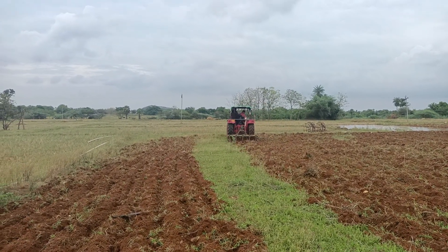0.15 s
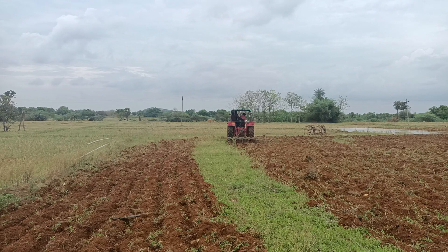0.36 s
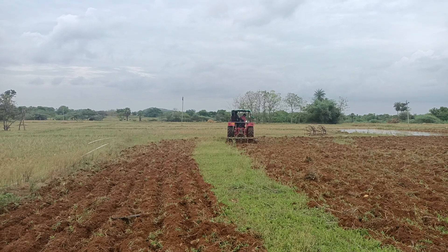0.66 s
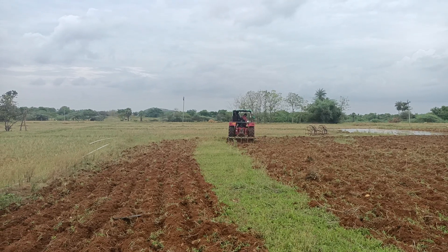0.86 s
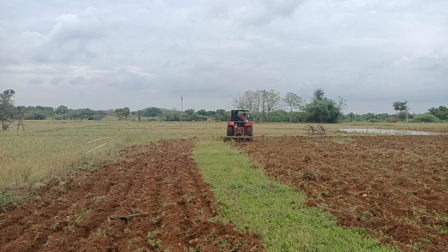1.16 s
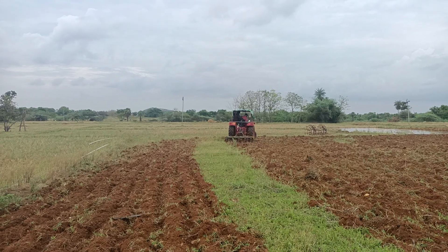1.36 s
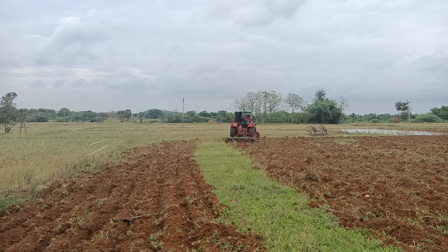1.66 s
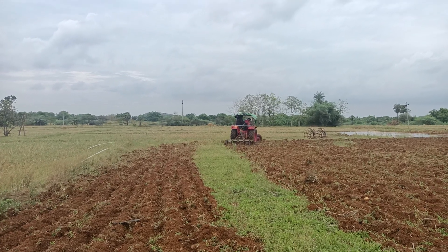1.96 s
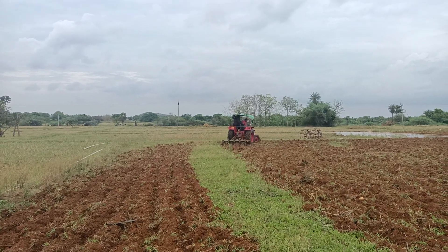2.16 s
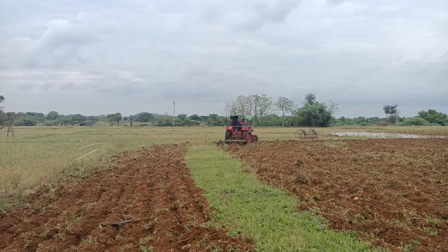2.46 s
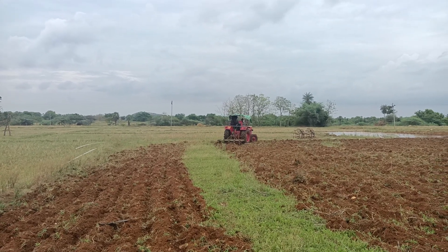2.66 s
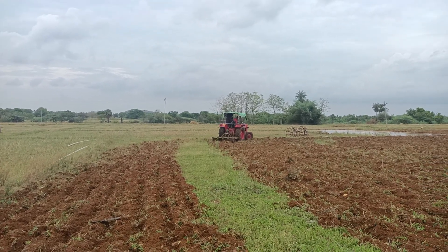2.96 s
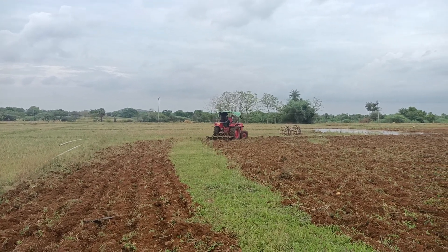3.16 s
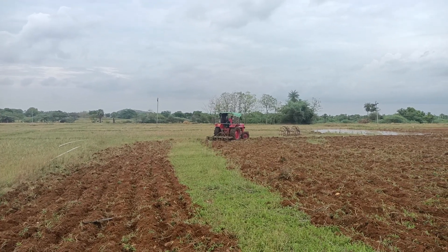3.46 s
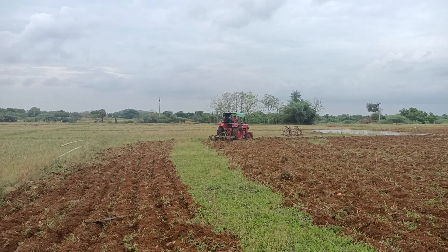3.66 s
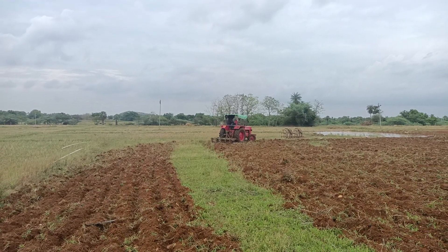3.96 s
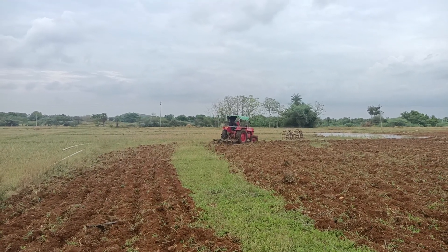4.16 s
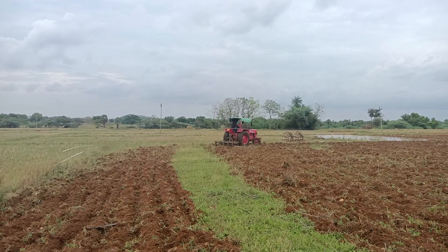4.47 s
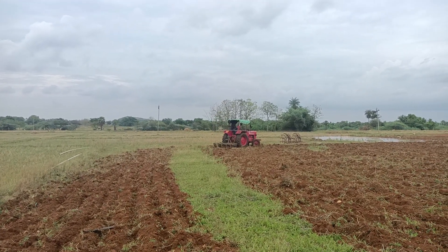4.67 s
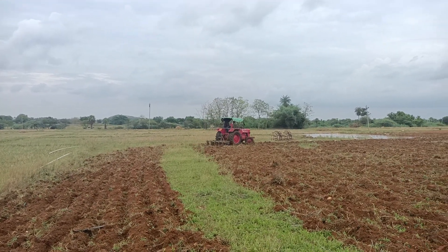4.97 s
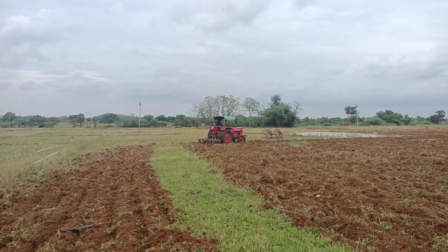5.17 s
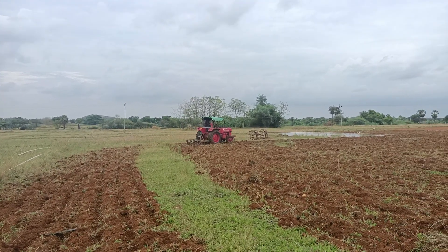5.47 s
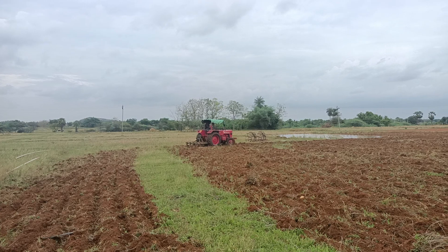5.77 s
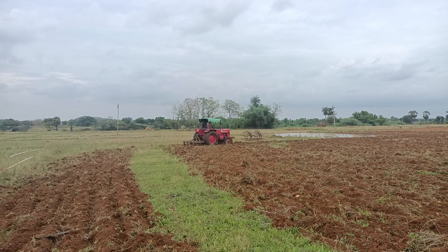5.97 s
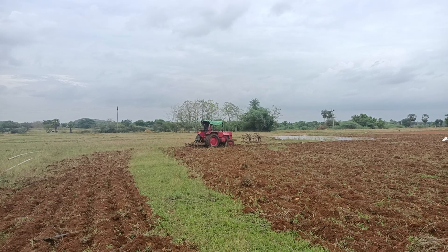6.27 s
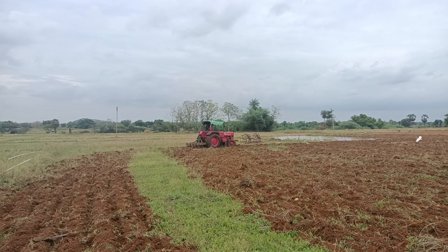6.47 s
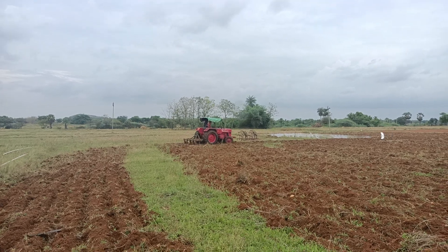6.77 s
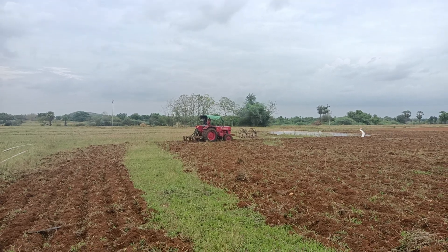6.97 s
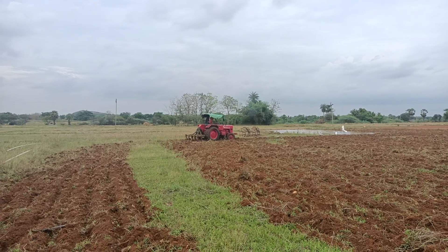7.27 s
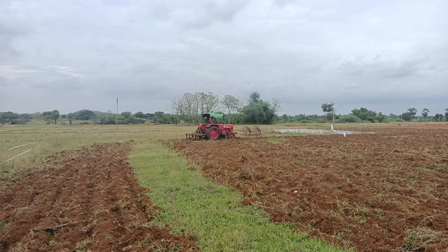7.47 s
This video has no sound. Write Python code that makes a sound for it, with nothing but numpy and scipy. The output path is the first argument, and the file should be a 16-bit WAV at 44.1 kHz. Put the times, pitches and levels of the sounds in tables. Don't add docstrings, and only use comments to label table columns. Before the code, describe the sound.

An open field heard through an unshielded stereo microphone. From 0 to 3 seconds a distant diesel tractor runs fast, its firings nearly merging into a low throbbing drone with rough exhaust and faint hiss; a few wind bumps land on the right around 1 second. From about 2.7 to 4.2 seconds wind slams both sides, strongest on the left near 3.2 to 3.7, with booming, overloaded pops. Beneath it the engine bogs down sharply, and steel tines clank at 3.6. Between 4 and 5.5 seconds it chugs slowly and unevenly, each stroke a thump, knock and hissing puff. From 5.4 bird chips tick quickly in front while the engine pulls harder, brighter and more clattery. It speeds up near 6.8, coasts with softened puffs around 7, slows, and begins rising again at the 7.6-second end. Tiny insect buzzes and metal clinks appear throughout.

```python
import sys
import numpy as np
from scipy import signal
from scipy.fft import rfft, irfft, next_fast_len
from scipy.io import wavfile
from scipy.ndimage import uniform_filter1d

SR = 44100
rng = np.random.default_rng(int(sys.argv[2]) if len(sys.argv) > 2 else 0)


def magnitude_from_level(level_db):
    exponent = np.asarray(level_db, float) / 20
    return 10 ** exponent


def generate_wav(signal):
    frames = np.transpose(np.atleast_2d(signal))
    scaled = np.clip(frames, -1, 1) * 32767
    pcm = np.round(scaled).astype(np.int16)
    wavfile.write(sys.argv[1], SR, pcm)


N = 335601

# (frequency [Hz], level [dB per Hz])
FIELD_COLOUR = [(20, -31), (40, 2.5), (100, 5), (200, -9.5), (330, -19), (680, -16), (2500, -18.5),
                (3700, -21), (5600, -39), (6900, -32.5), (8500, -36.5), (10800, -40), (12000, -44),
                (16000, -56)]
# (time [s], left level [dB], right level [dB])
BREEZE = [(0, -39.5, -40.5), (1.3, -40, -41), (2.3, -40, -45), (3.5, -31, -51), (4.3, -47.5, -51.5),
          (4.9, -46, -53.5), (5.6, -50, -57), (6.9, -59, -74), (7.6, -50, -43)]
# (time [s], flutter level [dB], bass over flutter [dB], length [ms])
LEFT_GUSTS = [(0.68, -55.5, 27, 18), (1.22, -54, 21, 50), (2.556, -64, 30.5, 74), (2.821, -45, 18, 20),
              (2.864, -41.5, 10, 97), (2.943, -19.5, -5, 28), (3.0, -47, 23.5, 72), (3.059, -20.5, -7, 31),
              (3.138, -32, 9, 46), (3.2, -11.5, -5, 26), (3.318, -17.5, -7, 34), (3.404, -21, -2, 15),
              (3.41, -27, -0.5, 91), (3.646, -32, 5.5, 137), (3.688, -20, 3, 18), (3.834, -49.5, 28, 16),
              (3.878, -41, 18.5, 48), (3.991, -44, 22, 45), (4.061, -48, 21.5, 44), (4.17, -33, 9, 93),
              (4.356, -49.5, 17, 24), (5.14, -39.5, 12, 61), (5.238, -51, 18, 51), (5.32, -58.5, 21.5, 33),
              (5.67, -66, 31, 60), (6.048, -67, 23.5, 140), (6.147, -66, 29.5, 66), (6.277, -63.5, 26, 30),
              (7.262, -59, 30, 19), (7.528, -69, 32, 63), (7.568, -67, 36.5, 26)]
RIGHT_GUSTS = [(0.048, -41, 13.5, 29), (0.649, -43, 7.5, 62), (0.798, -50.5, 28.5, 29),
               (0.887, -32.5, 8, 61), (0.921, -61, 3, 25), (0.998, -42.5, 8, 32), (1.114, -24.5, -1, 11),
               (1.272, -36, 4, 17), (2.726, -31.5, 3, 60), (2.805, -21, 5, 16.4), (2.862, -42, 13, 44),
               (2.945, -23.5, -2, 32), (3.027, -38.5, 11.5, 80), (3.086, -27.5, -3, 22),
               (3.274, -21, -4, 36), (3.338, -43, 10.5, 90), (3.381, -56, -3, 40), (3.58, -52, 19, 105),
               (3.646, -48, 16, 36), (4.141, -53, 19, 14), (7.544, -77, 13, 36)]
# (time [s], peak pressure [full scale], frequency [Hz])
LEFT_POPS = [(2.9266, 0.28, 135), (2.9417, 0.36, 200), (2.9493, 0.17, 90), (3.0517, -0.22, 200),
             (3.0587, -0.43, 240), (3.0971, 0.13, 90), (3.1285, 0.2, 200), (3.1439, -0.33, 200),
             (3.1775, -0.37, 165), (3.1902, -0.22, 90), (3.2011, -0.77, 200), (3.2083, -0.47, 240),
             (3.222, 0.61, 90), (3.229, -0.36, 240), (3.2382, -0.16, 90), (3.2934, 0.13, 90),
             (3.3152, -0.41, 240), (3.3254, -0.6, 135), (3.3476, -0.17, 90), (3.3861, -0.32, 240),
             (3.4018, 0.6, 135), (3.4259, -0.37, 200), (3.4557, 0.31, 110), (3.4869, -0.14, 110),
             (3.6064, 0.21, 165), (3.6559, -0.22, 135), (3.6734, 0.16, 135), (3.6874, -0.26, 290),
             (3.6956, 0.52, 135), (3.7046, 0.13, 90), (3.8806, -0.19, 200), (4.1068, 0.16, 135),
             (4.1375, 0.18, 110), (4.2044, 0.2, 135)]
RIGHT_POPS = [(0.8032, -0.14, 110), (0.8872, -0.13, 110), (0.9017, 0.08, 90), (1.111, 0.37, 240),
              (1.1198, -0.1, 135), (2.6356, 0.09, 110), (2.7241, -0.12, 240), (2.7314, -0.09, 110),
              (2.7461, -0.13, 200), (2.8037, 0.32, 165), (2.8184, -0.1, 165), (2.9334, 0.16, 200),
              (2.9527, 0.16, 110), (3.021, -0.12, 200), (3.03, -0.21, 165), (3.0479, 0.1, 165),
              (3.0734, 0.07, 90), (3.271, 0.17, 165), (3.278, 0.28, 110), (3.2918, 0.2, 200),
              (3.3047, 0.1, 110), (3.3797, -0.07, 90)]
# (time [s], peak pressure [full scale], frequency [Hz], port [0 left, 1 right])
STRAY_POPS = [(5.126, .17, 220, 0), (5.245, .07, 150, 0), (7.263, .075, 105, 0), (7.53, -.1, 120, 0),
              (3.3256, -.3, 400, 0), (3.4018, .25, 400, 0), (3.4058, -.42, 330, 0), (3.646, -.2, 280, 0),
              (3.5806, .1, 260, 0), (4.056, .1, 240, 0), (4.175, .14, 380, 0), (1.111, .12, 550, 1),
              (2.8045, .15, 450, 1), (3.274, -.3, 400, 1)]
# (time [s], level [dB], frequency [Hz], 60 dB decay [s])
CLINKS = [(.012, -49, 9200, 0.22), (.76, -52, 9200, 0.36), (.76, -62, 6800, .1), (3.463, -49.5, 4600, 0.07),
          (3.56, -58, 5720, 0.28), (3.585, -40, 2750, 0.15), (3.575, -53, 4650, 0.25),
          (3.585, -49, 5740, 0.18), (3.58, -49, 5250, .06), (3.585, -52, 7400, 0.099),
          (3.586, -53, 10400, 0.11), (3.575, -61, 11600, .2), (3.84, -54.5, 4060, 0.24),
          (3.93, -52, 6800, 0.35), (3.93, -48, 9200, 0.18), (3.958, -46, 9200, 0.22),
          (4.093, -43, 4570, 0.055), (5.793, -42, 4450, 0.08), (5.8, -42, 4600, .14),
          (7.115, -54, 4600, 0.1), (7.06, -65, 7800, .9), (7.24, -68, 7800, .9), (3.585, -63, 12300, .07),
          (3.585, -63, 14100, .07), (3.58, -50, 6050, .18), (4.65, -54, 4550, .14), (4.83, -54, 4050, .1),
          (4.955, -55, 4550, .14), (6.21, -51, 4000, .1), (6.77, -48, 3620, .1), (3.59, -54, 9000, .08)]
# (time [s], peak level [dB], frequency [Hz])
CHIPS = [(5.027, -35, 3600), (5.1342, -35, 3730), (5.4251, -23, 4200), (5.431, -33, 4050),
         (5.6246, -27.5, 3390), (5.6999, -34, 4600), (5.8491, -32, 3510), (5.8716, -28, 3930),
         (6.1764, -41, 4940), (6.2377, -29, 3600), (6.2881, -26.5, 3420), (6.3799, -28.5, 3680),
         (6.5026, -36, 3750), (6.6184, -29.5, 3470), (6.6473, -29, 3210), (6.669, -35, 3600),
         (6.6947, -32, 3380), (6.7347, -37, 3650), (6.7566, -35, 3700), (7.1586, -30.5, 3330),
         (7.21, -30.5, 2840), (7.236, -33, 3390), (7.3422, -38, 3900), (7.3736, -30, 2980),
         (7.3911, -29.5, 3520), (7.4919, -35, 2900)]
# (time [s], level [dB], start in the rasp [samples], length [s])
BUZZES = [(.70, -62, 8200, .05), (1.19, -64, 8900, .04), (3.44, -66, 8500, .05), (3.735, -64, 8500, .05),
          (1.5, -66, 8500, .05), (1.93, -65, 8500, .05), (3.988, -66, 8500, .05), (4.32, -65, 8500, .05),
          (4.67, -66, 8500, .05), (4.94, -66, 8500, .05), (6.68, -62, 8500, .045), (5.33, -64, 8500, .05),
          (7.01, -60, 8500, .055), (7.415, -55, 8600, .048)]
# (time [s], firing rate [firings/s])
SPEED = [(0.0, 29.867), (0.39, 33.655), (0.69, 30.368), (0.98, 32.893), (1.65, 32.69), (3.09, 28.216),
         (3.36, 25.482), (3.71, 15.154), (4.21, 19.291), (4.62, 16.735), (5.29, 13.605), (5.97, 19.067),
         (6.4, 15.788), (6.51, 16.444), (6.77, 24.592), (6.89, 25.261), (7.29, 17.974), (7.61, 23.2)]
# (time [s], effort [dB])
EFFORT = [(0, -3.5), (.35, -6.5), (1.15, -7), (1.4, -8), (1.65, -7.5), (1.9, -6), (2.4, 0), (3.15, 1),
          (3.9, -4), (4.4, 0.5), (4.7, -1), (5.3, 5), (5.6, 11), (6.2, 12.5), (6.4, 6.5), (6.76, 12),
          (7.44, 5), (7.61, -4)]
# (start [s], length [s], share cut [0-1])
COASTS = [
    (0.07, 0.094, 0.6),
    (0.548, 0.11, 0.51),
    (3.626, .12, 0),
    (4.754, 0.062, 0.05),
    (6.807, 0.38, 0.99),
    (7.17, 0.25, 0.45),
    (7.58, .1, 0.9),
]
# (time [s], share side-on [0-1])
SWING = [(0, 0.2), (2, 0), (2.5, 0), (4.5, 0.17), (5.9, 0.65), (6.8, 0.63), (7.2, 1.01), (7.61, 0.75)]
# (first [dB], second [dB], third
# [dB], fourth [dB])
CYLINDERS = [
    (5.5, 4.5, 4, 3.5),
    (7, 5.5, 7.5, 1),
    (-2, -3, -2.5, -3.5),
    (0.5, -9, -1, -10),
]
# (base [dB], per doubling of speed [dB], share of effort [dB/dB], fuel cut [dB], side-on [dB])
LAYERS = [
    (-43, 11.5, 0.27, -15.5, -0.3),
    (-48.5, 7.5, 0.49, -15, -12),
    (-48, 2.5, 0.3, -10.5, -6),
    (-60, 2.5, 0.65, -8, 5.5),
    (-63, 4, 0.96, -35, 1),
    (-68.5, 4.5, 0.086, -2.5, 19),
]
# (frequency [Hz], level [dB per Hz])
THUMP_COLOUR = [(20, -52), (35, -45), (55, 23), (75, 18.5), (110, 7), (140, 9), (175, 2), (210, 1),
                (300, -13), (600, -76)]
ROAR_COLOUR = [(300, -48.5), (420, -2.5), (560, 8), (700, 3.5), (880, -3.5), (1230, 3), (1700, -4),
               (2700, -6.5), (3400, -12), (4500, -56.5), (9000, -90)]
CLATTER_COLOUR = [(1200, -55), (3200, -5), (4500, -12), (5600, -13.5), (6200, -52), (10000, -59)]
PUFF_COLOUR = [(3000, -59), (5500, -10), (6900, -6), (8200, -5), (9250, 1), (10500, -8), (11500, -16),
               (15800, -73)]
# (frequency [Hz], width [Hz], level [dB])
PIPE = [(1018, 93, -4), (1237, 110, 2), (1703, 170, -2.5), (2232, 100, -2.5), (2726, 140, -3),
        (3174, 100, -5), (4540, 46, -22)]
# (frequency [Hz], share [0-1])
SAME = [(100, 0.87), (600, 0.98), (1200, 0.95), (2500, 0.75), (4000, 0.9), (6000, 0.6), (9000, 0.7),
        (14000, 0.7)]
# (frequency [Hz], left minus right [dB])
LEAN = [(60, 2), (120, -3.5), (240, -0.5), (480, 0.0), (950, -1), (1890, 1), (3770, -3.5), (7520, -1.5),
        (15000, -11.5)]
# (frequency [Hz], left leads by [rad])
LEAD = [(600, -0.25), (1200, 0), (2500, -1.43), (4000, -1.5), (5500, -.5), (7000, -4), (9000, -4),
        (14000, -4.5)]
# (frequency [Hz], share [0-1])
ECHO = [(400, 0.012), (950, 0.033), (1450, 0.33), (1900, 0.48), (2900, 0.55), (3400, 0.065), (6000, 0.24)]

FIELD_DB = -50
FIRST_TURN = .70
REFERENCE_SPEED = 18.5
CUT_EDGE_S = 0.067
FAN_HZ_PER_FIRING, FAN_DB, FAN_CUT_DB = 14.2, -55.5, -7
FAN_FADES_BELOW, FAN_FADE_DB_PER_FIRING = 30.4, 13.5
PIPE_DB, PIPE_CHANCE_DB = -2.5, 6
PIPE_LATE = .14
ROAR_LATE_S = .006
POP_EDGE = 0.52
ECHO_S = 1 / 484
EDGE_HZ = 15920


def evened(x):
    return x / np.sqrt(np.mean(x ** 2) + 1e-20)


def read(points, hz):
    f, value = np.transpose(points)
    return np.interp(np.log(hz + 1), np.log(f + 1), value)


def curves(rows):
    s, *columns = np.transpose(rows)
    return [np.interp(np.arange(N) / SR, s, c) for c in columns]


def add(mix, s, sound):
    part = mix[round(s * SR):][:len(sound)]
    part += sound[:len(part)]


def drift(shape, samples):
    return evened(uniform_filter1d(rng.standard_normal(shape), samples))


def coloured(x, points):
    log_gain = np.log(magnitude_from_level(read(points, abs(np.fft.fftfreq(16384, 1 / SR)))))
    taps = np.fft.ifft(np.exp(np.conj(signal.hilbert(log_gain)))).real[:6000]
    return evened(signal.oaconvolve(x, taps)[:N])


def band(x, lo_hz, hi_hz, order=2):
    return evened(signal.sosfilt(signal.butter(order, [lo_hz, hi_hz], "band", fs=SR, output="sos"), x))


def field():
    return [magnitude_from_level(FIELD_DB) * coloured(v, FIELD_COLOUR) for v in rng.standard_normal((2, N))]


def breeze():
    lumps = magnitude_from_level(2.0 * np.tanh(drift((2, N), 1800)))
    rumble = band(rng.standard_normal((2, N)), 62, 155.0)
    return magnitude_from_level(np.array(curves(BREEZE))) * evened(lumps * rumble)


def gusts(rows):
    flutter, bass = np.zeros((2, N))
    for s, db, bass_db, ms in rows:
        hump = signal.windows.hann(round(ms * 0.0019 * SR)) ** 1.16
        add(flutter, max(s - ms * 0.00092, 0), magnitude_from_level(db) * hump)
        add(bass, max(s - ms * 0.00097, 0), magnitude_from_level(db + bass_db) * hump)
    noise = rng.standard_normal((3, N))
    bands = (band(noise[0], 168, 372, order=3), band(noise[1], 77.4, 149.0),
             band(noise[2], 270, 670, order=3))
    mid, low, bright = [v / np.sqrt(uniform_filter1d(v ** 2, 900) + 0.029) for v in bands]
    ragged = magnitude_from_level(3.5 * np.tanh(band(rng.standard_normal(N), 15, 70, order=3)))
    hard = .5 * (ragged * flutter) ** 1.9
    return ragged * (flutter * mid + hard * bright) + bass * low


def pops():
    out, t = np.zeros((2, N)), np.arange(-882, 882) / SR
    snap = np.cos(2 * np.pi * 480 * t) * np.exp(-(600 * t) ** 2)
    left = [(*row, 0) for row in LEFT_POPS]
    right = [(*row, 1) for row in RIGHT_POPS]
    for s, peak, hz, port in left + right + STRAY_POPS:
        swing = np.cos(2 * np.pi * hz * t) * np.exp(-(1.6 * hz * t) ** 2)
        add(out[port], s + t[0], peak * swing)
        add(out[port], s + t[0], POP_EDGE * peak * abs(peak) * snap)
    return signal.sosfiltfilt(signal.butter(2, 48, "high", fs=SR, output="sos"), out)


def insects():
    out = np.zeros(N)
    wings = 1 + 2.1 * np.cos(2 * np.pi * 240 * np.arange(N) / SR)
    rasp = band(rng.standard_normal(N), 8400, 8500) * wings
    for s, db, hz, length in BUZZES:
        n = round(length * SR)
        swell = np.linspace(.2, 1, n) * signal.windows.tukey(n, .3)
        add(out, s, magnitude_from_level(db) * swell * rasp[round(hz):][:n])
    return out


def birds():
    out, t = np.zeros(N), np.arange(1500) / SR
    u = t[:round(.007 * SR)]
    scatter = rng.standard_normal(1500) * np.exp(-t / 0.027) * (rng.random(1500) < .03)
    for s, db, hz in CHIPS:
        pitch = hz * (.92 + 0.303 * np.exp(-u / 0.0023))
        chip = magnitude_from_level(db - 6.5) * np.sin(2 * np.pi * np.cumsum(pitch) / SR) * np.hanning(len(u))
        add(out, s, chip)
        add(out, s + 0.006, 0.1 * np.convolve(chip, scatter))
    return out


def clinks():
    out, t = np.zeros(N), np.arange(9000) / SR
    shiver = drift((len(CLINKS), len(t)), 150)
    for (s, db, hz, t60), chatter in zip(CLINKS, shiver):
        ring = np.sin(2 * np.pi * hz * t)
        ring += .5 * np.sin(2 * np.pi * 1.005 * hz * t)
        ring += .4 * np.sin(2 * np.pi * .987 * hz * t)
        onset = 1 - np.exp(-t / .002)
        add(out, s, magnitude_from_level(db - 60 * t / t60) * (.9 + .4 * chatter) * ring * onset)
    return out


def fuel_cut():
    cut = np.zeros(N)
    for s, length, share in COASTS:
        add(cut, s, share * np.ones(round(length * SR)))
    return uniform_filter1d(cut, round(CUT_EDGE_S * SR))


def layer_levels():
    doublings = np.log2(curves(SPEED)[0] / REFERENCE_SPEED)
    controls = [np.ones(N), doublings, curves(EFFORT)[0], fuel_cut(), curves(SWING)[0]]
    return np.array(LAYERS) @ np.array(controls)


def firings():
    speed = curves(SPEED)[0]
    turns = FIRST_TURN + np.cumsum(speed) / SR
    number = turns.astype(int)
    spread_db = np.array([[1.3], [2.1], [.8], [2.6]])
    chance_db = rng.standard_normal((300, 4))[number].T * spread_db
    chance_db *= np.clip(1 - 0.027 * (speed - 22), .3, 1)
    size_db = chance_db + np.array(CYLINDERS)[:, number % 4]
    return {"turns": turns, "size_db": size_db, "colour_db": chance_db[[3, 2, 0, 1]],
            "levels_db": layer_levels()}


def fan():
    speed = curves(SPEED)[0]
    fade_db = FAN_FADE_DB_PER_FIRING * np.clip(FAN_FADES_BELOW - speed, 0, 2)
    db = FAN_DB + FAN_CUT_DB * fuel_cut() - fade_db
    fuzz = uniform_filter1d(uniform_filter1d(rng.standard_normal((2, N)), 1500), 1500)
    tone = np.exp(2j * np.pi * np.cumsum(FAN_HZ_PER_FIRING * speed) / SR)
    return magnitude_from_level(db) * evened(((fuzz[0] + 1j * fuzz[1]) * tone).real)


def thump_and_knock(source):
    speed, levels_db = curves(SPEED)[0], source["levels_db"]
    fired, blown = (np.diff(np.floor(source["turns"] - late), prepend=0) > 0 for late in (0, .22))
    t = np.arange(3000) / SR
    boom = -np.cos(2 * np.pi * 124 * t) * np.exp(-t / 0.012)
    first = 1.05 * (speed / 32) ** 4.6
    pulses = first * np.roll(fired, round(0.0019 * SR)) + np.roll(blown, round(0.00638 * SR))
    booms = signal.oaconvolve(pulses * magnitude_from_level(source["size_db"][2]), boom)[:N]
    size = next_fast_len(N)
    silencer = magnitude_from_level(read(THUMP_COLOUR, np.fft.rfftfreq(size, 1 / SR)))
    thump = evened(irfft(rfft(booms, size) * silencer, size)[:N])
    ring = np.sin(2 * np.pi * 670 * t) * (t / .003) * np.exp(-t / 0.0021)
    rattle = fired + 0.23 * np.roll(fired, 90) * rng.standard_normal(N)
    knock = evened(signal.oaconvolve(np.roll(rattle, 60) * magnitude_from_level(source["size_db"][3]), ring)[:N])
    speed_makeup = np.sqrt(24 / speed)
    return speed_makeup * (magnitude_from_level(levels_db[0] - 1.6) * thump + magnitude_from_level(levels_db[1] - 4.0) * knock)


def pipe(source):
    number, out = source["turns"].astype(int), np.zeros(N)
    fuel = np.clip(1 - .8 * fuel_cut(), 0, 1)
    chance, noise = rng.standard_normal((300, len(PIPE), 2)), rng.standard_normal(N)
    for k, (hz, width_hz, db) in enumerate(PIPE):
        late = PIPE_LATE * abs(chance[number, k, 0])
        strength = magnitude_from_level(PIPE_CHANCE_DB * np.tanh(chance[number, k, 1]))
        angle = np.clip(source["turns"] % 1 - late, 0, 1)
        puff = fuel * angle * np.exp(-angle / 0.11) + .02 * (1 - fuel)
        r = np.exp(-np.pi * width_hz / SR)
        poles = [1, -2 * r * np.cos(2 * np.pi * hz / SR), r * r]
        out += magnitude_from_level(db) * evened(signal.lfilter([1, 0, -1], poles, noise * puff * strength))
    return magnitude_from_level(source["levels_db"][2] + PIPE_DB) * evened(out)


def engine(source):
    speed = curves(SPEED)[0]
    roar_db, clatter_db, hiss_db, block_db = source["levels_db"][2:]
    angle = (source["turns"] + 0.027 * drift(N, 700) * (speed / 20) ** 3.2) % 1
    size_db = source["size_db"] + 2.0 * drift(N, 90)
    long_puff = evened(magnitude_from_level(size_db[0]) * angle * np.exp(-angle / 0.18))
    short_puff = evened(magnitude_from_level(size_db[1]) * (angle / .06) ** 2 * np.exp(-angle / 0.053))
    fuel = np.clip(1 - 0.7 * fuel_cut(), .08, 1)
    long_puff, short_puff = (fuel * puff + 0.15 * (1 - fuel) for puff in (long_puff, short_puff))
    crisp = 1 - .88 * np.clip((speed - 30.6) / 1.6, 0, 1)
    short_puff = crisp * short_puff + 0.68 * (1 - crisp)
    swell = 0.35 * magnitude_from_level(2 * drift(N, 5000))
    rush = (speed / 24) ** 2
    flow = rng.standard_normal((4, N)) * magnitude_from_level(0.34 * source["colour_db"])

    roar = coloured(flow[0] * (long_puff + 0.95 * rush), ROAR_COLOUR)
    roar = np.roll(roar, round(ROAR_LATE_S * SR))
    clatter = coloured(flow[1] * (1.3 * short_puff + 0.52 * long_puff + 0.55 * rush), CLATTER_COLOUR)
    hiss = coloured(flow[2] * (short_puff + 0.034 * long_puff + swell * (speed / 32) ** 4), PUFF_COLOUR)
    sizzle = band(flow[3] * (short_puff + 0.35 * swell * (speed / 30) ** 2), 9900, 15900)
    sizzle_db = 1.8 * (hiss_db + 56.5) - 75
    block = band(flow[3, ::-1] * (long_puff + 0.071), 1250, 3100)
    valves = band(flow[2, ::-1] * crisp * short_puff, 4700, 5750, order=3)
    exhaust = magnitude_from_level(roar_db - 0.5) * roar + magnitude_from_level(hiss_db - 2.5) * hiss + magnitude_from_level(sizzle_db) * sizzle
    metal = magnitude_from_level(clatter_db - 2.5) * clatter + magnitude_from_level(block_db) * block + magnitude_from_level(clatter_db - 14) * valves
    return exhaust + metal


def ports(direct, scattered):
    size = next_fast_len(N)
    hz = np.fft.rfftfreq(size, 1 / SR)
    same = np.clip(read(SAME, hz), 0, 1)
    a, b = rfft(direct, size), rfft(scattered, size)
    half = magnitude_from_level(read(LEAN, hz) / 2) * np.exp(.5j * read(LEAD, hz))
    pair = np.array([a * half, (same * a + np.sqrt(1 - same ** 2) * b) / half])
    pair *= 1 - np.clip(read(ECHO, hz), 0, .95) * np.exp(-2j * np.pi * hz * ECHO_S)
    return 1.04 * irfft(pair, size)[:, :N]


def scene():
    far, far_scattered = field()
    small_life = insects() + birds() + clinks()
    source = firings()
    solid = fan() + thump_and_knock(source) + pipe(source)
    air = ports(engine(source) + solid + small_life + far, engine(source) + far_scattered)
    wind = breeze() + pops() + np.array([gusts(LEFT_GUSTS), gusts(RIGHT_GUSTS)])
    return air + wind


def low_pass(x):
    return signal.sosfilt(signal.butter(12, 16660, fs=SR, output="sos"), x)


def record(dry):
    squeezed = np.tanh(dry + dry ** 3 / 3)
    lowpass = signal.firwin(511, EDGE_HZ, window=("kaiser", 9), fs=SR)
    limited = signal.oaconvolve(squeezed, lowpass[None], "same")
    return low_pass(limited)


dry = scene()
out = record(dry)
generate_wav(out)
```